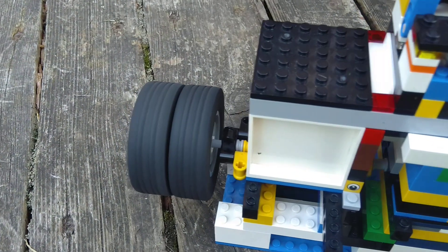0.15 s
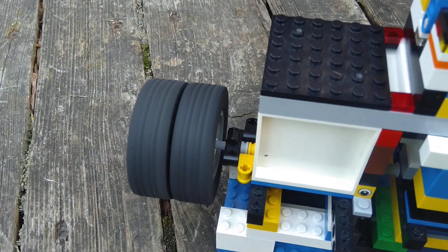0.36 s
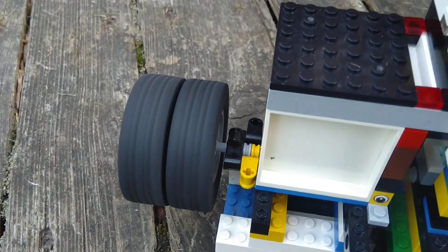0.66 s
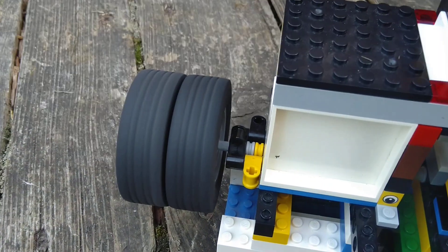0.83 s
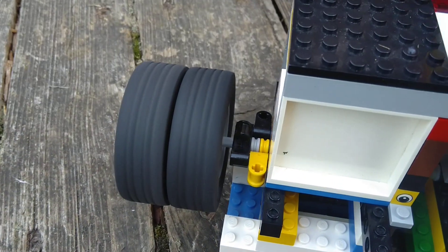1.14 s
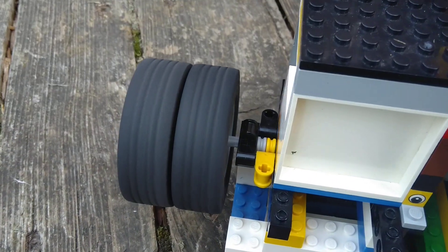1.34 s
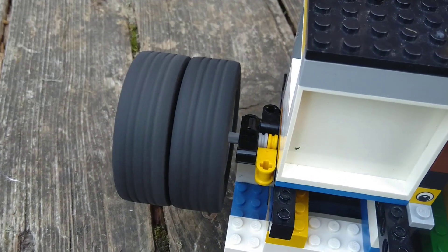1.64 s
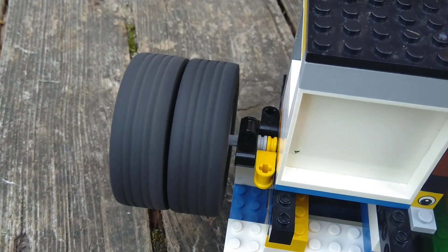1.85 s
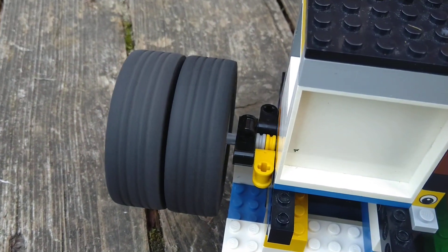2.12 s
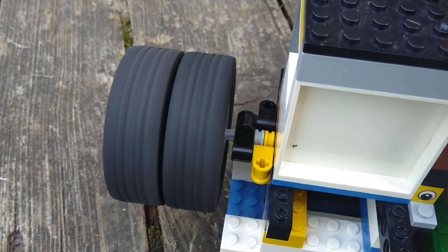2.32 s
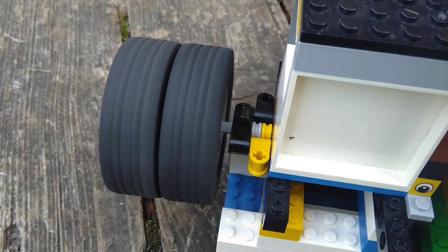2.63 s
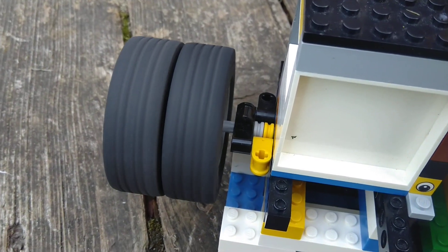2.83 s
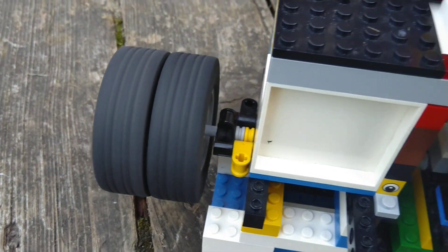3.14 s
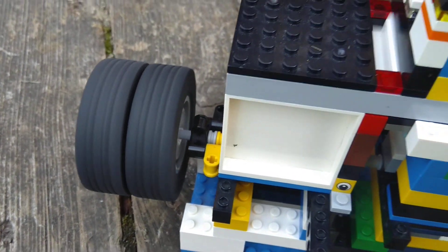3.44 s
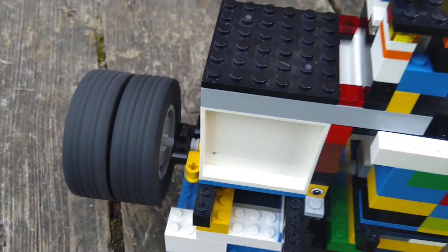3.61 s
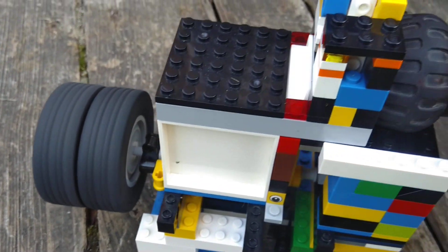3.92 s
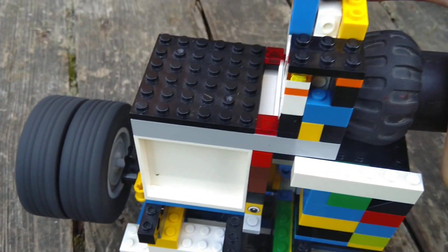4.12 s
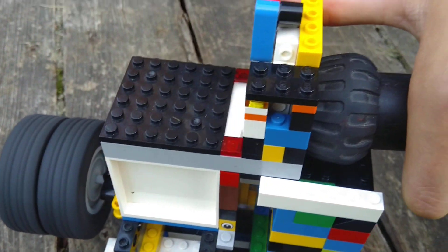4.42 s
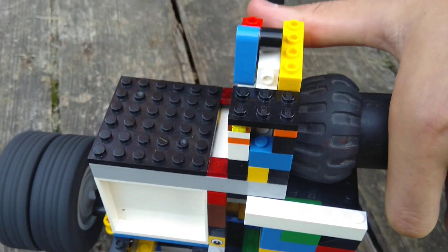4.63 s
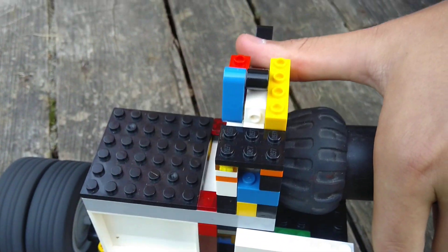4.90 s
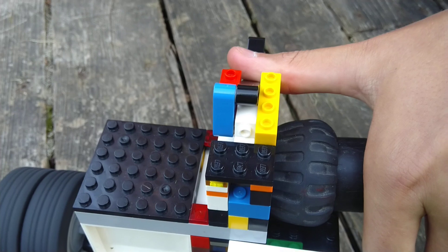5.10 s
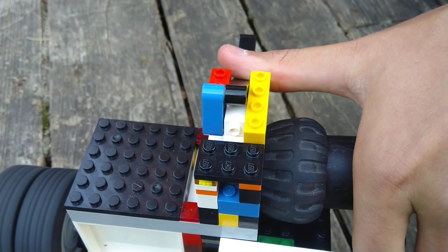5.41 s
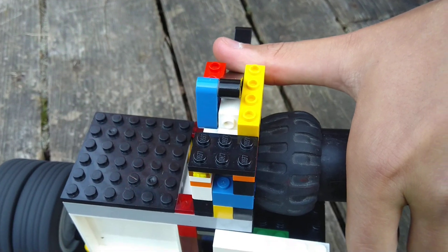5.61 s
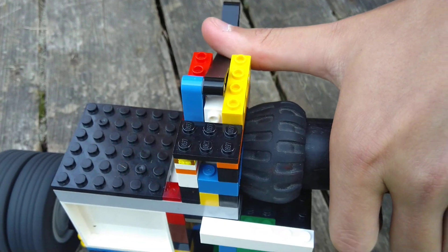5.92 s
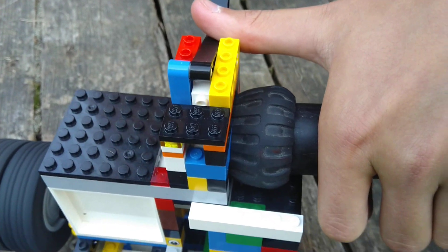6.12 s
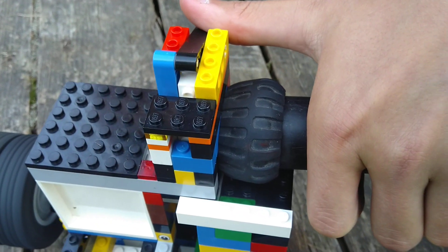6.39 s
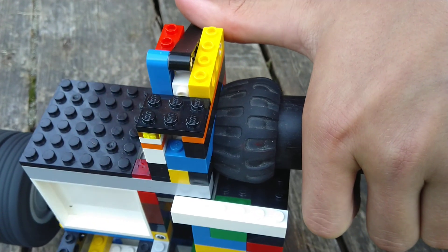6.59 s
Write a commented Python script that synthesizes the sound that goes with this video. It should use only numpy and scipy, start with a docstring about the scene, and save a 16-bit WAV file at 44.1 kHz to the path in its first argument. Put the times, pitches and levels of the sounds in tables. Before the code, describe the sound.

Rushing air flutters in time with the quick plastic clatter of a suction-driven toy engine, heard up close on a wooden deck. For about two seconds the beat slows and the hiss is sharp and whistly; then the chugging grows fuller and climbs back to a fast, even pace. A vacuum cleaner's faint whine continues throughout, while the moving microphone shifts the hiss between left and right.

```python
"""On a wooden deck, close by, a small plastic piston engine runs on the suction of a vacuum cleaner.
With the throttle nearly shut it slows under a sharp hiss; opened, it gulps air, thumps and speeds up.
The valve modulates the turbulent air noise in step with the crank, and housing, duct and slit
resonate in breathy whistles. Parts clack as they take up their play; the cleaner whines far off.
The microphone pair drifts about, so that colour, balance and the echo from the boards shift."""
import sys
import numpy as np
from scipy import signal
from scipy.fft import rfft, irfft, next_fast_len
from scipy.io import wavfile
from scipy.ndimage import map_coordinates

SR = 44100
rng = np.random.default_rng(int(sys.argv[2]) if len(sys.argv) > 2 else 0)


def master_out(mix):
    """Clip the mix to full scale and print it as 16-bit PCM to the path in sys.argv[1]."""
    frames = np.transpose(np.atleast_2d(mix))
    ceiling = np.clip(frames, -1, 1)
    pcm = np.round(ceiling * 32767).astype(np.int16)
    wavfile.write(sys.argv[1], SR, pcm)


N = 297675

# The slit's narrow beam swinging across the microphones: time_s, left_minus_right_db
SLIT_BEAM = [(0.0, 0), (0.34, -6), (0.43, 3), (0.77, -6), (0.86, 9), (1.02, -1), (1.26, 7.0), (2.24, 6),
             (2.33, -5.5), (2.69, 5.5), (4.32, 5.5), (4.53, -5), (5.24, 0.5), (6.75, -6.5)]


def from_db(db):
    """Amplitude ratio of a level in decibels."""
    return 10 ** (np.asarray(db) / 20)


def rms_one(x):
    """Normalisation to unit mean power."""
    return x / np.sqrt(np.mean(x ** 2) + 1e-20)


def in_time(rows):
    """Linear interpolation of each column over the first, time_s: one value a sample."""
    time_s, *columns = np.transpose(rows)
    return [np.interp(np.arange(N) / SR, time_s, column) for column in columns]


def drift(rate_hz):
    """Low-passed noise: a slow random fluctuation of rms 1."""
    step = 40
    pole = np.exp(-2 * np.pi * rate_hz * step / SR)
    slow = signal.lfilter([1], [1, -2 * pole, pole ** 2], rng.standard_normal(N // step + 2002))[2000:]
    return np.interp(np.arange(N) / step, np.arange(len(slow)), rms_one(slow))


def bell(offset, width):
    """Gaussian curve of height 1."""
    return np.exp(-.5 * (offset / width) ** 2)


def each_turn(turns, angle, width):
    """Periodic pulse about one crank angle; angle and width in turns."""
    return bell((turns - angle + .5) % 1 - .5, width)


def later(x, samples):
    """Propagation delay that varies with time."""
    return map_coordinates(x, [np.arange(N) - samples], order=3, mode="nearest")


def open_path(x, lag):
    """Path difference through open air: x as it reaches the left microphone."""
    return later(x, 1.07 * lag - 0.92)


def throttle():
    """The aperture that admits the flow: 0 nearly shut, 1 open."""
    shuts_s, opens_s, move_s = 0.085, 2.23, 0.23
    t = np.arange(N) / SR
    return 1 + .5 * (np.tanh((t - opens_s) / move_s) - np.tanh((t - shuts_s) / move_s))


def air_swings():
    """Slowly changing levels of the air noise, three in dB about their means: the gulp grows as the throttle
    opens."""
    # Air noise at the microphones: time_s, gulp_db, housing_db, slit_db
    levels = [(0.0, -37.5, -15, -26.5), (0.13, -32, -17.5, -18), (0.19, -41.5, -19.5, -17.5),
              (1.26, -40.5, -20, -20), (1.47, -42.5, -21, -21), (2.24, -43, -20, -22),
              (2.37, -33.5, -19, -23.5), (2.67, -33.5, -17, -23.5), (3.53, -28, -20.5, -25),
              (3.85, -36.5, -26.5, -33), (4.38, -36.5, -30.5, -29.5), (4.44, -35, -26.5, -31.5),
              (4.85, -34, -26.5, -33.5), (5.55, -36, -30, -33), (5.92, -36, -26.5, -31.5),
              (6.41, -35, -27, -25.5), (6.66, -33, -24.5, -25.5), (6.75, -34, -23, -24)]
    return np.array([db - db.mean() for db in in_time(levels)])


def air_bands():
    """Turbulence is broadband noise: per band a common, a left-only and a right-only signal."""
    # Bounds of the seven bands (rumble, gulp, rush, housing, duct, slit, fine hiss): edge_hz
    edges = [25, 300, 900, 2250, 3900, 5000, 6900, 17500]
    # Spectral shapes of the low, the ringing and the fine air noise: frequency_hz, relative_density_db
    low_air = [(18, -40), (30, -14), (76, -5.5), (128, -11), (280, -16.5), (361, -14.5), (465, -8),
               (519, -9), (645, -3.5), (760, -6), (1170, 1.5), (1430, 2.5), (1570, 1.5), (2300, -1),
               (2990, -5), (5060, -120)]
    ringing_air = [(1290, -39), (2200, -15.5), (2600, -6), (2830, -1), (3240, -2), (3930, -10.5),
                   (4430, -7.5), (4990, -8), (5560, -5), (7200, -18.5), (9360, -36), (15800, -120)]
    fine_air = [(6500, 1), (7320, -4.5), (8810, -5.5), (9920, -1), (10800, -5), (12100, -6.5),
                (14000, -7.5), (15100, -7), (16200, -10.5)]
    size = next_fast_len(N)
    hz = np.maximum(np.arange(size // 2 + 1) * SR / size, 1)
    white = rfft(rng.standard_normal((3, size), dtype=np.float32))
    for low, high, shape in zip(edges, edges[1:], [low_air] * 3 + [ringing_air] * 3 + [fine_air]):
        shape_hz, shape_db = np.transpose(shape)
        colour = from_db(np.interp(np.log(hz), np.log(shape_hz), shape_db))
        passband = 1 / np.sqrt((1 + (low / hz) ** 30) * (1 + (hz / high) ** 30))
        yield rms_one(irfft(white * np.float32(passband * colour), size)[:, :N])


def valve_chop(turns, opening, lag):
    """Amplitude modulation, in dB per band: each gulp swells the lows, the valve chokes the highs."""
    leak_shut = (2.4 - 4 * opening + 0.16 * lag) * each_turn(turns, angle=0.21, width=0.066)
    intake_shut = (1.4 - 0.2 * opening - 0.34 * lag) * each_turn(turns, angle=0.69, width=0.087)
    gulp = (0.98 + 5.5 * opening - 0.06 * lag) * (each_turn(turns, angle=0.094, width=0.13) - .3)
    uneven = from_db(0.22 * drift(7.5))   # no two turns alike
    swell, choke = uneven * gulp, uneven * (leak_shut + intake_shut)
    return [0.25 * swell, swell, 0.35 * swell, -.8 * choke, -1.1 * choke, -1.1 * choke, -.9 * choke]


def air_noise(turns, opening, lag):
    """Turbulent flow chopped by the valve; coherence between the microphones falls with frequency."""
    # Level of each band: base_db, gulp_swing_share, housing_swing_share, slit_swing_share
    band_levels = [(-48, 0.47, .1, .05), (-36.5, 0.94, .05, 0.041), (-27.5, 0.4, 0.23, 0.042),
                   (-21.5, -0.018, 0.85, 0.055), (-26, -0.31, 0.45, 0.18), (-26, -0.003, 0.054, 0.98),
                   (-28, -0.17, 0.27, 0.36)]
    # Each band across the pair: left_minus_right_db, db_per_lag_sample, slit_beam_share,
    # coherence, coherence_per_lag_sample
    band_sides = [(-0.5, 0, 0, 1, -0.0012), (1, -0.35, 0, 0.99, -0.012), (1.5, -.5, 0, 0.93, 0.0078),
                  (1.1, -0.7, 0.046, .87, -0.016), (-2, -1.3, 0.5, 0.51, -0.02), (1.5, 0.5, 1, 0.19, 0.04),
                  (-1.7, -0.28, 0, 0.14, 0.024)]
    chop_db = valve_chop(turns, opening, lag)
    swings_db, (beam_db,), gust = air_swings(), in_time(SLIT_BEAM), drift(12.3)
    incoherent, direct, via_housing = np.zeros((3, 2, N))
    for k, band in enumerate(air_bands()):
        base_db, *swing_shares = band_levels[k]
        side_db, side_slope, beam_share, coherence, coherence_slope = band_sides[k]
        flicker_db = (0.46 * gust + 1.24 * drift(7.5)) * (.5 if k == 6 else 1)   # fine hiss is smoothest
        level_db = base_db + swing_shares @ swings_db + chop_db[k] + flicker_db
        pan_db = side_db + side_slope * lag + beam_share * beam_db
        gain = from_db(level_db + pan_db * [[.5], [-.5]])
        alike = np.clip(coherence + coherence_slope * lag, 0, 1)
        path = via_housing if k in (3, 4) else direct   # housing and duct bands
        path += gain * np.sqrt(alike) * band[0]
        incoherent += gain * np.sqrt(1 - alike) * band[1:]
    left = open_path(direct[0], lag) + later(via_housing[0], lag)
    return incoherent + [left, direct[1] + via_housing[1]]


def whistles(lag):
    """Resonance: housing, duct and slit each filter flow noise into a narrow, breathy tone."""
    # The three resonances: pitch_hz, bandwidth_hz
    resonances = [(3290, 320), (4470, 240), (5560, 250)]
    # Their strengths: time_s, housing_db, duct_db, slit_db
    levels = [(0, -26, -28, -40), (.15, -25, -23, -36), (.42, -30, -39, -35), (.55, -25, -31, -22.5),
              (.9, -22, -34, -21.5), (1.3, -32, -33, -22.5), (1.5, -25, -24, -30), (2.2, -29, -33, -20.5),
              (2.33, -20, -24, -36), (2.6, -28, -24, -24), (3.5, -28, -35, -35), (3.9, -31, -47, -43),
              (5.65, -44, -39, -47), (6.2, -36, -35, -30), (6.75, -38, -38, -34)]
    # Each across the pair: left_minus_right_db, slit_beam_share, added_lag_samples
    sides = [(-1.5, .05, -0.29), (-0.5, .2, -0.25), (1, .4, -1.6)]
    out, (beam_db,) = 0, in_time(SLIT_BEAM)
    for (hz, width), db, (side_db, beam_share, added_lag) in zip(resonances, in_time(levels), sides):
        radius = np.exp(-np.pi * width / SR)
        b, a = [1, 0, -0.38], [1, -2 * radius * np.cos(2 * np.pi * hz / SR), radius ** 2]
        ring = signal.lfilter(b, a, rng.standard_normal(N))
        ring = rms_one(signal.lfilter(b, a, ring))   # a second pass narrows the peak
        ring *= from_db(db + 1.8 * drift(4.8))
        pan_db = side_db + beam_share * beam_db
        out = out + from_db(pan_db * [[.5], [-.5]]) * [later(ring, lag + added_lag), ring]
    return out


def cleaner_whine():
    """Steady rotation radiates a tone: the cleaner's motor, wavering a little."""
    # Motor tone: time_s, pitch_hz, rms_level_db
    motor = [(0, 464, -41.5), (.6, 471, -44.5), (1.3, 476, -50), (2.3, 478.5, -52), (3, 474, -46),
             (3.6, 469, -45), (4.5, 466, -48.5), (5.5, 463, -45.5), (6.75, 463, -44.5)]
    pitch_hz, level_db = in_time(motor)
    amplitude = np.sqrt(2) * from_db(level_db + 0.5 * drift(12))
    return amplitude * np.sin(2 * np.pi * np.cumsum(pitch_hz + 0.35 * drift(2.1)) / SR)


def clacks(turns, opening):
    """Impacts excite damped modes of the plastic as piston and valve take up their play twice a turn."""
    # Modes of the plastic: pitch_hz, level_db, t60_s
    modes = [(596, -40, 0.014), (1160, -3.5, 0.033), (1613, -4.5, 0.022), (2930, -6, 0.017),
             (3275, 0, 0.086), (4600, -28, .015), (5560, -20, .015)]
    strike_db = -27.5 + 6.5 * opening + 0.67 * air_swings()[1]   # follows the housing's level
    strike_turns = np.add.outer(np.arange(int(turns[-1])), [.13, .9]).ravel()
    strikes = np.searchsorted(turns, strike_turns + 0.0261 * rng.standard_normal(len(strike_turns)))
    scatter_db = 3.05 * rng.standard_normal((len(strikes), len(modes)))
    out = np.zeros(N)
    for (hz, mode_db, t60_s), chance_db in zip(modes, scatter_db.T):
        impulses = np.full(N, 1e-18)
        impulses[strikes] = from_db(strike_db[strikes] + mode_db + chance_db)
        radius, omega = from_db(-60 / (t60_s * SR)), 2 * np.pi * hz / SR
        out += signal.lfilter([0, np.sin(omega)], [1, -2 * radius * np.cos(omega), radius ** 2], impulses)
    return out


def thump(turns, speed_hz, opening):
    """Fourier synthesis: crank harmonics align in a pressure dip once a turn, stronger with speed."""
    # Spectrum of the dip: crank_speed_multiple, level_db
    harmonics = [(2, 0.5), (3, 1), (4, -26), (5, -36), (6, -1.5), (7, -8.5), (8, -11.5), (9, -17)]
    level_db = -54.5 + 9 * opening + 11 * np.log2(speed_hz / 30)
    phase = 2 * np.pi * (turns - 0.429)   # zero at the dip
    return -from_db(level_db) * sum(from_db(db) * np.cos(k * phase) for k, db in harmonics)


def deck_echo(x):
    """Reflection: the boards return the treble late, cutting a comb that slides as the pair moves."""
    # Echo delay: time_s, left_samples, right_samples
    delays = [(0, 25, 27), (0.698, 21, 17), (1.6, 25.6, 23.5), (3.3, 25, 27.3), (4.2, 22, 23),
              (5.6, 36, 26), (6.75, 19, 24)]
    treble = signal.sosfilt(signal.butter(4, 6800, "high", fs=SR, output="sos"), x)
    return from_db(-16) * np.array([later(side, lag) for side, lag in zip(treble, in_time(delays))])


def coloured_by_place(x):
    """Resonance and diffraction colour the sound at three places, blended as the microphones move."""
    # Peaks and hollows left by the engine's shape and the deck: centre_hz, width_hz, left_db, right_db
    by_flywheel = [(1440, 84, 0, -1), (1970, 240, 6, 8.5), (2420, 206, 9.5, -5.5), (3280, 130, -1.5, -1),
                   (4290, 130, -6, 6), (5080, 160, 4, -12), (5640, 110, 7, 3), (4600, 160, 5.5, 5.5),
                   (5830, 83, -1, -12), (7260, 290, -17, 7), (11100, 240, 1, -18), (11800, 350, 13, 10),
                   (13400, 190, 9, -8), (13500, 380, 9, 1)]
    by_cylinder = [(890, 240, -2.5, -2.4), (1763, 86, 1.3, 3), (2160, 146, -3.5, -4.5),
                   (3510, 95, 2.5, 4.3), (3880, 140, -2.5, 1.5), (5370, 83, 3, -3), (7500, 230, -1, -0.5),
                   (8020, 610, 5, 1), (9800, 690, 0, -3), (12000, 980, 3, 2), (13150, 200, 3, 5),
                   (14100, 700, 0, -2.4)]
    by_throttle = [(1680, 210, 5, 7), (2300, 120, -0.5, -1.5), (2540, 73, 4.5, 7.5), (3800, 84, -0.5, -2),
                   (4730, 150, 1.5, 1), (5030, 250, 0, 4), (5550, 190, 0.5, -2), (6540, 410, 5.5, -0.5),
                   (7930, 340, 9, 0), (9500, 300, -2, -5), (12000, 700, -1, -0.5), (13100, 350, 6, 7),
                   (14200, 450, -1, -.5)]
    # Bending round the housing delays the left side, one list a place: centre_hz, width_hz, lag_rad
    diffraction = [
        [(2260, 120, 1), (3060, 260, -1.2), (3900, 200, 0.35), (4400, 200, 0.98), (5800, 520, -2.1)],
        [(2060, 130, -0.61), (4660, 320, 0.81)],
        [(2170, 220, -0.31), (2800, 300, 0.69), (4600, 560, 0.47), (5440, 200, -1.5)],
    ]
    # Path of the microphones: time_s, place (0 flywheel, 1 cylinder, 2 throttle)
    route = [(0, 0.7), (3.45, 0.77), (3.9, 1.17), (5.6, 0.83), (5.9, 1.92), (6.75, 2.11)]
    size, (place,), out = next_fast_len(N), in_time(route), 0
    hz, spectrum = np.arange(size // 2 + 1) * SR / size, rfft(x, size)
    grid_hz = np.linspace(0, SR / 2, 2049)
    causal_fold = np.r_[1, np.full(2047, 2), 1, np.zeros(2047)]   # gives a resonance its minimum phase
    for k, peaks in enumerate([by_flywheel, by_cylinder, by_throttle]):
        db = sum(np.outer(sides_db, bell(grid_hz - centre, width)) for centre, width, *sides_db in peaks)
        cepstrum = irfft(np.log(from_db(db))) * causal_fold
        left_lag_rad = sum(rad * bell(grid_hz - centre, width) for centre, width, rad in diffraction[k])
        response = np.exp(rfft(cepstrum) - 1j * np.outer([1, 0], left_lag_rad))
        gain = [np.interp(hz, grid_hz, side) for side in response]
        nearness = np.clip(1 - abs(place - k), 0, 1)
        out = out + nearness * irfft(spectrum * gain, size)[:, :N]
    return out


def scene():
    """Superposition of the engine, its echo and the cleaner at both microphones."""
    # Crank rotation: time_s, speed_hz
    crank = [(0.0, 30.11), (0.5, 23.99), (1.0, 19.95), (1.5, 17.36), (2.0, 14.9), (2.3, 14.19),
             (2.6, 16.24), (3.0, 19.17), (3.4, 22.1), (3.8, 24.57), (4.2, 26.88), (4.7, 28.47),
             (5.3, 29.48), (6.0, 29.94), (6.75, 29.08)]
    # How much later the left microphone hears the housing: time_s, lag_samples
    left_lag = [(0, 1.5), (.75, 3), (1.25, 3.5), (2.75, 4.5), (3.3, 3.5), (3.75, -.5), (4.25, -3),
                (5.25, -5), (6.75, -5.5)]
    (speed_hz,), (lag,), opening = in_time(crank), in_time(left_lag), throttle()
    turns = np.cumsum(speed_hz) / SR
    knocks = clacks(turns, opening)
    engine = air_noise(turns, opening, lag) + [open_path(knocks, lag), knocks]
    tones = thump(turns, speed_hz, opening) + cleaner_whine() + whistles(lag)
    return coloured_by_place(engine) + deck_echo(engine) + tones


def record(dry):
    """Band limiting and saturation: the deep bass rolls off, peaks clip, the top is cut."""
    bass_cut = signal.butter(3, 42, "high", fs=SR, output="sos")
    top_cut = signal.ellip(16, .3, 90, 15720, fs=SR, output="sos")
    clipped = np.clip(signal.sosfilt(bass_cut, dry), -1, 1)
    return signal.sosfilt(top_cut, .97 * clipped)


dry = scene()
out = record(dry)
master_out(out)
```